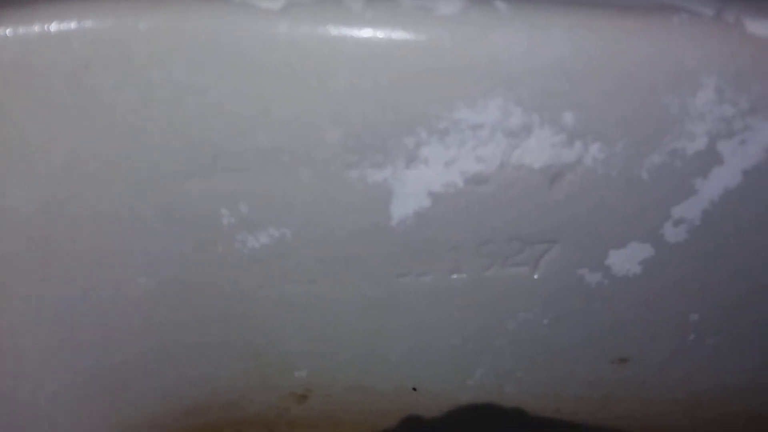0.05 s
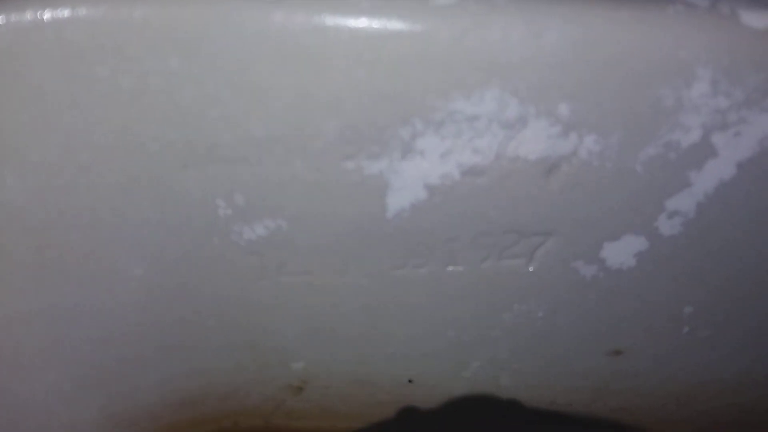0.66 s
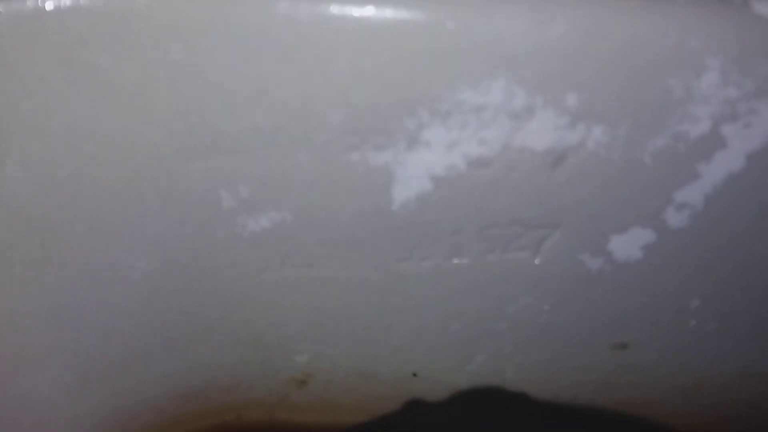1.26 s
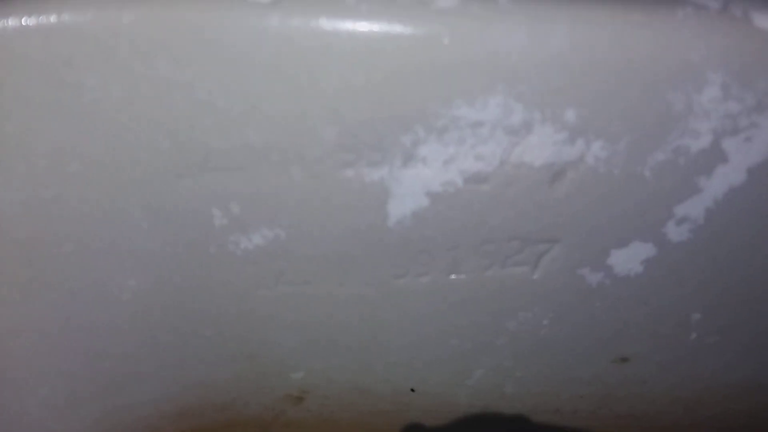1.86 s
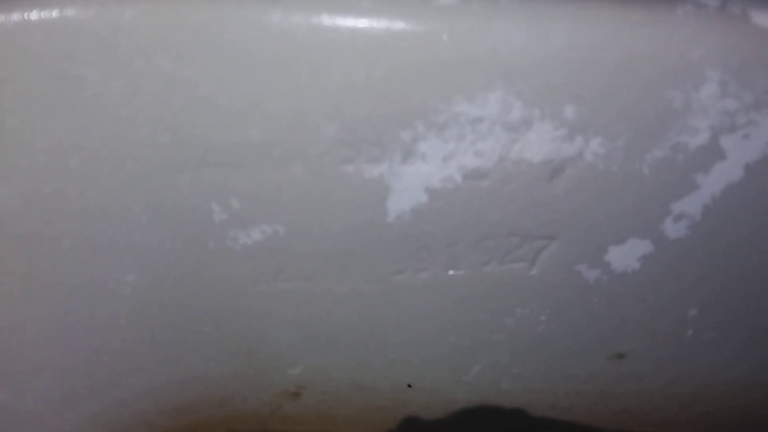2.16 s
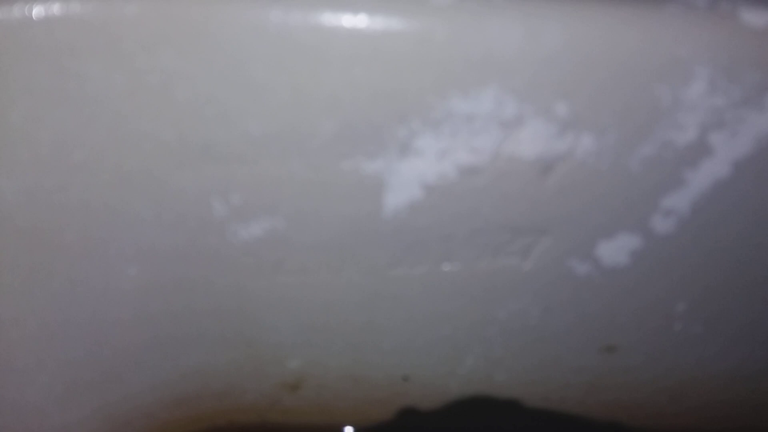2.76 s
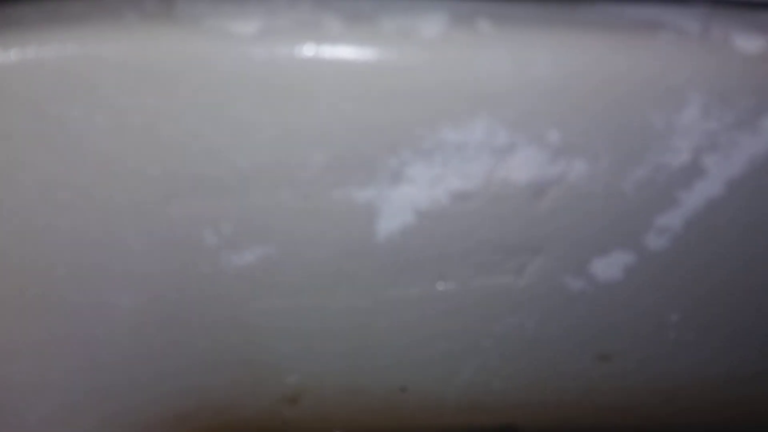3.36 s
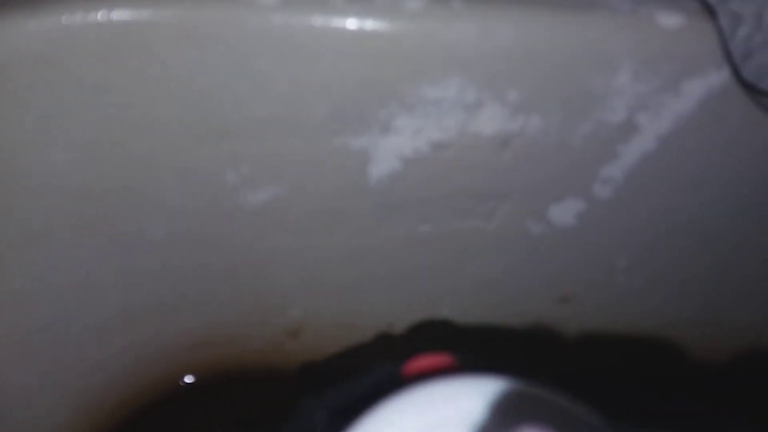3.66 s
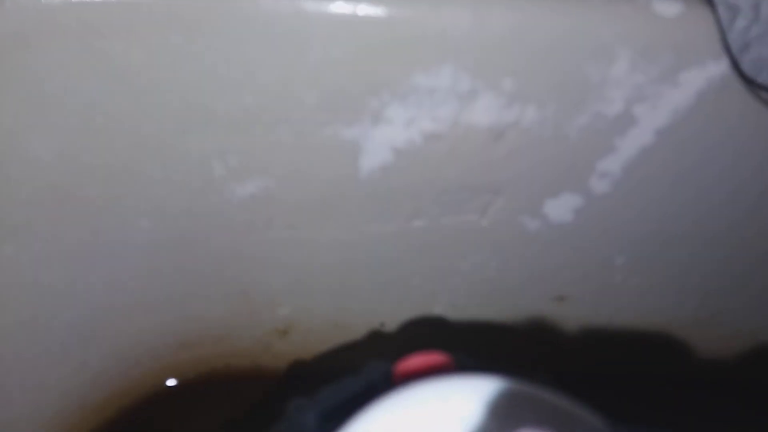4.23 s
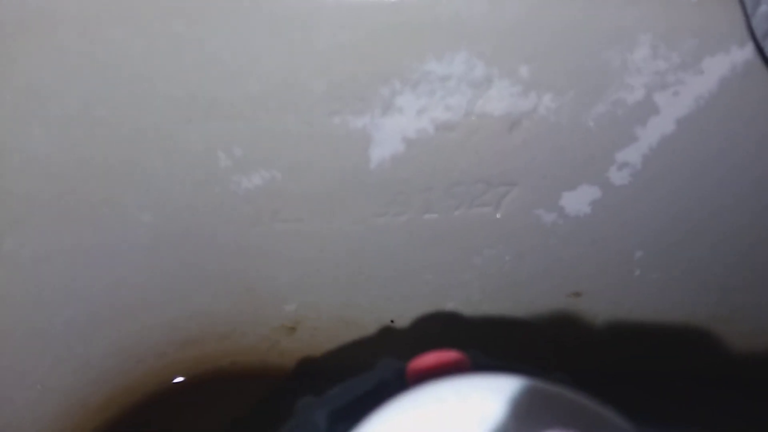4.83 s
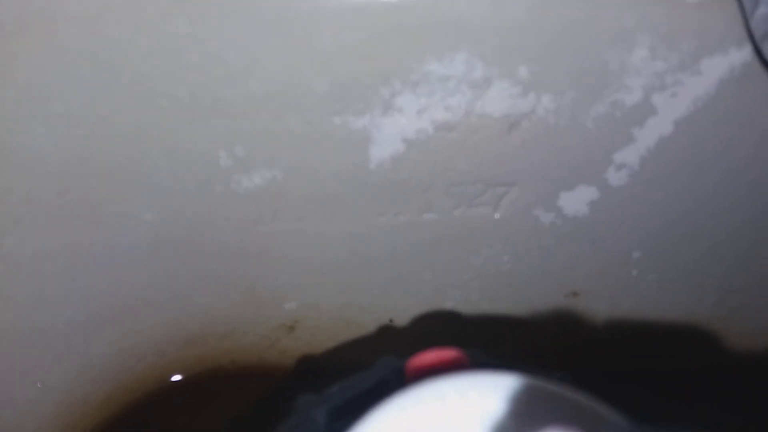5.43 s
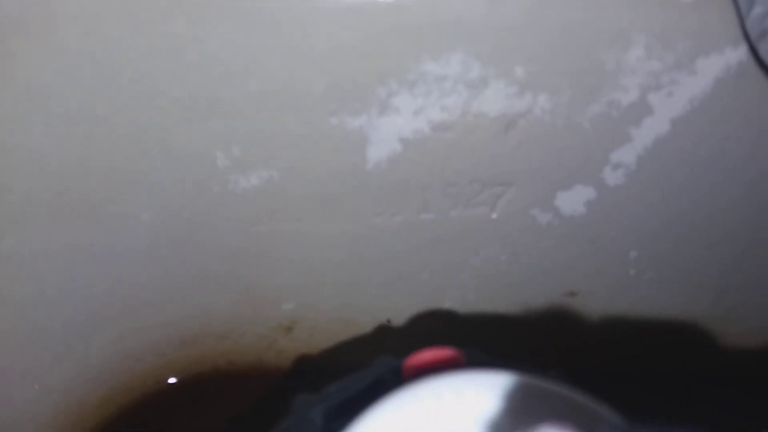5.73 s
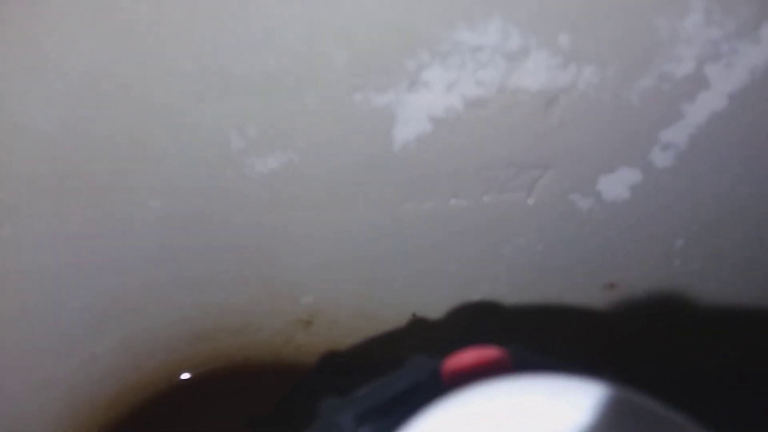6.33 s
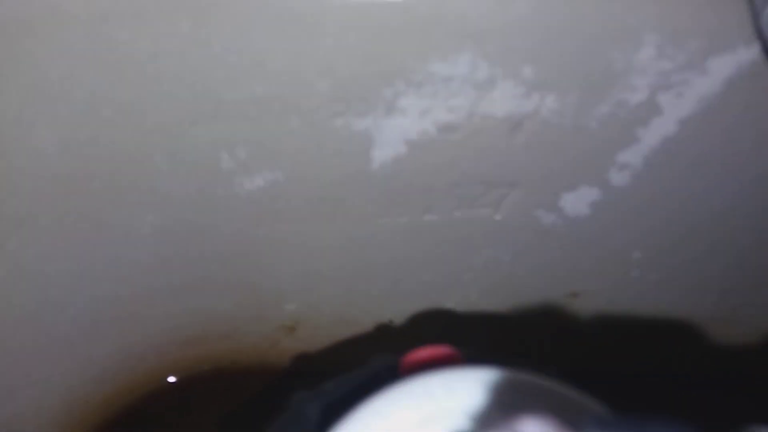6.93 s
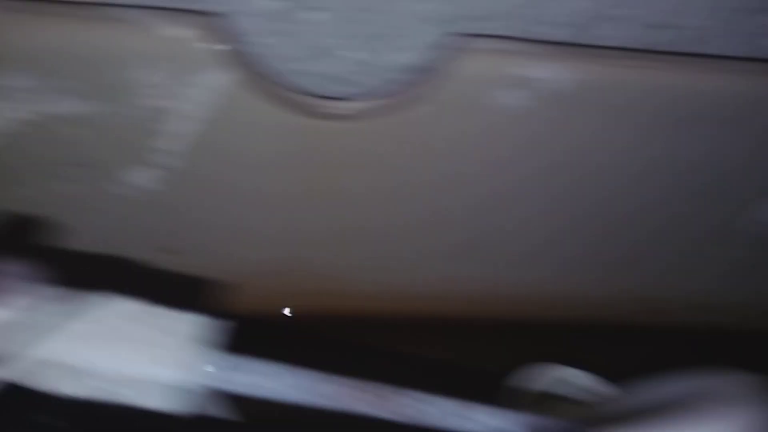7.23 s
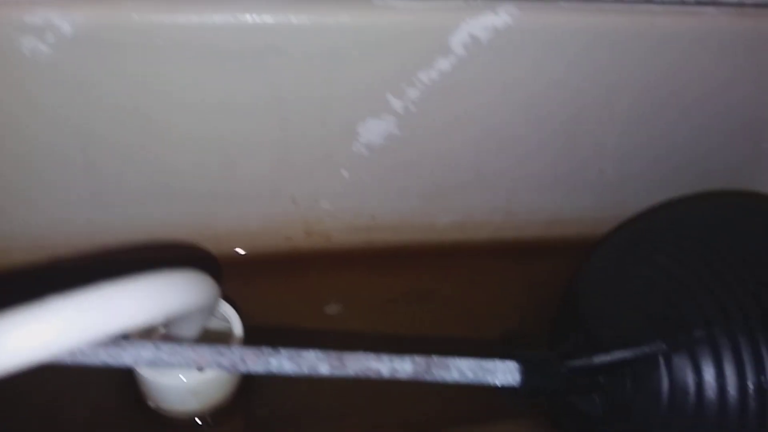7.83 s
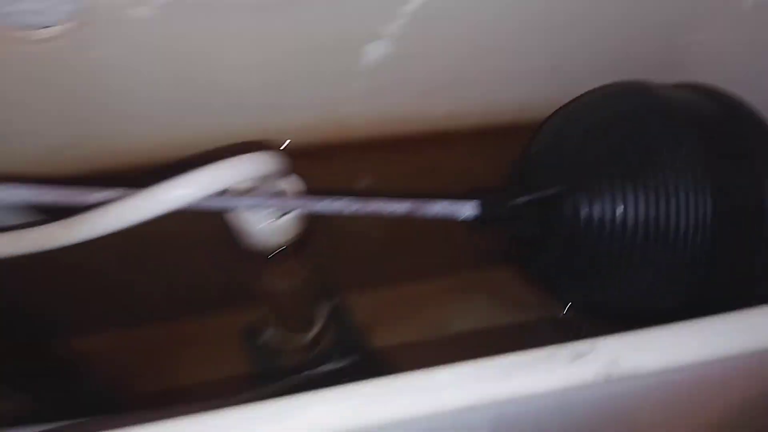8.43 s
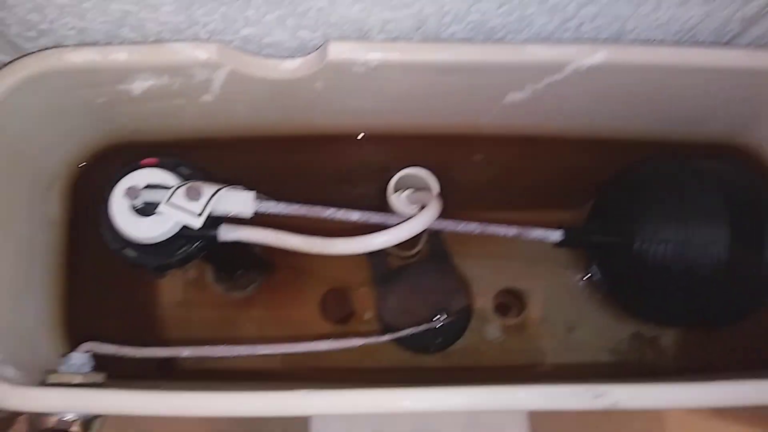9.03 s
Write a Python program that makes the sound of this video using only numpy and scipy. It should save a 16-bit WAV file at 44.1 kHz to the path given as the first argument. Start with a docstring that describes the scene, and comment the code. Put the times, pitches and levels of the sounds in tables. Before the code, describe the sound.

A toilet tank refills with a shrill hiss that softens and chokes off, leaving faint trickling spurts and one sharp click.

```python
"""A loud, whistling hiss: water jets through a float valve to refill an open porcelain toilet tank.
Tiny vapour bubbles collapse in the jet and make it shriek. It drops to a smooth rush, then the valve
shuts and only seeps in small spurts. The tank's ringing colours the water's sound. Near the end the
listening point, a hand-held camera, is lifted out of the tank with a bump and a click.
A low room rumble and a thin electronic whine lie underneath."""
import sys
import numpy as np
from scipy import signal
from scipy.fft import rfft, irfft
from scipy.io import wavfile
from scipy.ndimage import uniform_filter1d

SR = 44100
rng = np.random.default_rng(int(sys.argv[2]) if len(sys.argv) > 2 else 0)


def put_to_file(sound):
    """Save the sound as 16-bit audio at rate SR, in the file named by the first command-line argument."""
    columns = np.atleast_2d(sound).T  # one column per channel
    safe = np.clip(columns, -1, 1)
    whole_steps = np.round(safe * 32767)
    wavfile.write(sys.argv[1], SR, whole_steps.astype(np.int16))


N = 400428
T = np.arange(N) / SR  # time in seconds
F = np.maximum(np.fft.rfftfreq(N, 1 / SR), 1)  # frequency in Hz
# when the jet turns smooth, the valve shuts and the microphone clears the rim, in seconds
SMOOTH_S, SHUT_S, LIFT_S = 1.752, 3.807, 7.15

# Tone colour of the swirling water at each stage. Each row: frequency in Hz, relative level in dB.
JET_SPECTRUM = [(100,-39.5),(170,-23.5),(300,-19.5),(600,-12.5),(900,-16),(1300,-9.5),(2100,-1.5),(3200,-0.5),(4300,-1.5),(5500,2),(6800,2),(8000,-8.5),(10000,-19),(15500,-21)]
RUSH_SPECTRUM = [(100, -37), (170, -15), (330, -8.5), (600, -0.5), (900, -5), (1300, -1), (2100, 4),
                 (3200, -2), (4300, -6), (6800, -10), (8000, -16.5), (10000, -30), (15500, -34)]
CHOKE_SPECTRUM = [(100,-22),(200,-10),(600,3.5),(900,-14),(1500,6.5),(2300,0),(2850,4.5),(3500,-11),(4500,-8.5),(5900,-4.5),(8200,-11),(11000,-30),(15500,-28)]
SEEP_SPECTRUM = [(100, -23), (170, -15.5), (400, 7), (650, -5), (900, -13.5), (1300, 1), (2100, -10),
                 (3200, -7), (4300, -7), (6800, -14), (8000, -13.5), (10000, -28), (15500, -38)]
ABOVE_RIM_SPECTRUM = [(100,-32),(200,-3),(480,-7.5),(850,-4),(1350,-0.5),(1800,-3),(2500,-11.5),(3300,-16),(4200,-10.5),(6500,-17),(9300,-31),(12000,-28),(15500,-32)]
# Ringing of the tank's air and walls. Each row: frequency in Hz, width in Hz, boost in dB.
TANK_RESONANCES = [(180,17,-3),(233,33,9.5),(396.4,12,10),(464,31,5.5),(789,130,11.5),(876.7,62,18),(1026,90,11),(1134,50,10),(1442,72,7.5),(1553,139,15),(1682,70,11),(1861,154,15),(2050,26,1.5),(2324,254,17),(2543,51,9),(2672,44,8),(2740,22,5.5),(2789,150,10),(3020,250,10),(3230,44,-1),(3356,64,9.5),(3567,95,10.5),(3914,320,11),(4165,377,14),(4703,306,15.5),(5046,170,5),(5410,99,6),(5980,130,8),(6400,130,2.5),(6670,84,8.5),(7070,200,7),(8230,252,4.5),(8930,140,5.5),(10060,280,7.5),(11200,320,6.5),(13000,450,7.5),(14100,300,4),(15400,300,5)]
# Surges of the low whistle. Each row: peak time in seconds, level in dB, half-length in seconds.
WHISTLE_SURGES = [(0.012, -3.5, 0.012), (0.084, -1.5, 0.0046), (0.143, -6, 0.0075), (0.166, -6.5, 0.0096),
                  (0.197, -8.5, .009), (0.251, -9, 0.0035), (0.292, -15, 0.0069), (0.353, -9.5, 0.005),
                  (0.407, -14, 0.017), (0.564, -5.5, 0.0037), (0.732, -12.5, .006), (0.801, -7, 0.006),
                  (0.865, -10, 0.0034), (1.033, -13, 0.005)]
# Squeals of collapsing bubbles.
# Each row: peak time in seconds, level in dB, half-length in seconds, pitch in Hz.
BUBBLE_SQUEALS = [(.70, -20, 0.068, 3950), (0.73, -22, 0.0077, 3000), (0.792, -24, .012, 3000),
                  (0.9, -15, 0.0078, 3000), (0.912, -12, 0.0076, 3800), (1.683, -19.5, 0.034, 4220)]
# Spurts past the shut valve. Each row: start and end in seconds, body boost in dB, churn boost in dB.
LEAK_SPURTS = [(3.8, 3.95, 9, 5), (4.116, 4.21, 8.5, 4.5), (4.38, 4.544, 7.5, 4), (4.903, 5.816, 6, 2.5),
               (5.866, 6.396, 6, 2.5), (6.79, 7.25, 5, 0.5)]
# The overflow tube rings as the microphone passes it.
# Each row: peak time in seconds, level in dB, half-length in seconds.
TUBE_SWELLS = [(6.95, -50.5, 0.23), (7.47, -46, .19)]
# Knocks on the camera body.
# Each row: start in seconds, peak level in dB, decay in seconds, pitch in Hz, width in Hz.
CAMERA_KNOCKS = [(7.07,-32.5,0.015,2200,4970),(7.071,-36.5,0.015,178,110),(7.104,-44,.001,6200,5050),(7.133,-43,.001,6000,5000),(7.3119,-21,0.00057,3980,5500),(7.455,-37,0.0007,5400,4000)]
# Steady room air and microphone hiss. Each row: frequency in Hz, relative level in dB.
ROOM_SPECTRUM = [(25,-38),(60,-18),(95,-9),(130,-7.5),(177,3.5),(203,-2),(228,1.5),(270,-3),(600,-18.5),(2000,-44),(5000,-23),(9500,-28.5),(15500,-23.5)]


def valve():
    """The water goes from jet to rush to seep; lifting the microphone loses most of the tank's colour."""
    walls = tank(echo_db=-7, echo_s=0.0062)
    flowing = blend(jet(walls), rush(walls), step(SMOOTH_S, 0.0069))
    inside = blend(flowing, seep(walls), step(SHUT_S, 0.042)) + choke(walls)
    return blend(inside, above_rim(walls), step(LIFT_S, 0.19)) + hollow_air()


def water(levels_db, response, grain_db, flutter_db):
    """Countless tiny, uneven bursts in three fluttering bands: low churn, middle body and high hiss."""
    grains = rng.standard_normal(N) * amp(grain_db * np.clip(rng.standard_normal(N), -2, 1))
    bursts = rfft(grains) * response
    churn = 1 / (1 + (F / 1320) ** 12)
    hiss = 1 - 1 / (1 + (F / 3350) ** 12)
    # each band's level is set between the two frequencies beside it, in Hz
    bands = [(churn, 600, 1300), (1 - churn - hiss, 1400, 2100), (hiss, 3700, 7000)]
    out, shared_flutter = 0, walk(34)
    for (band, low_hz, high_hz), db in zip(bands, levels_db):
        strength = np.sqrt(2 * np.sum(np.abs(bursts[(F > low_hz) & (F < high_hz)]) ** 2)) / N
        flutter = flutter_db * (shared_flutter + walk(52))
        out = out + irfft(bursts * band, N) / strength * amp(db + flutter)
    return out


def jet(walls, thin_db_per_s=3.5, flare_db=3):
    """Bubbles collapse in the open valve. Body and spray thin as the float rises; hiss flares once."""
    levels_db = -31.5, -26 - thin_db_per_s * T, -21.5 + flare_db * hump(1.064, 0.065)
    spray = amp(-49 - 6 * T) * noise(walls * resonance(12000, 7000) ** 2)
    flow = water(levels_db, walls * colour(JET_SPECTRUM), grain_db=6, flutter_db=0.48)
    return flow + spray + shriek(walls) + whistles()


def shriek(walls, grow_db_per_s=3, climb_hz_per_s=560, jump_hz=800, width_hz=460):
    """Collapsing bubbles sputter, climb, jump in pitch and squeal, stirring the tank's resonances."""
    bubbles = cloud(width_hz)
    hz = 2450 + climb_hz_per_s * T + jump_hz * step(.66, .09) + 110 * walk(22.19)
    in_tank = shape(at_pitch(bubbles, hz), walls)
    loudness = np.sqrt(uniform_filter1d(in_tank ** 2, size=1500))
    squeals = sum(amp(db) * hump(at_s, half_s) * at_pitch(bubbles, squeal_hz)
                  for at_s, db, half_s, squeal_hz in BUBBLE_SQUEALS)
    sputter_db = 1.6 * walk(39)
    return in_tank / loudness * amp(-24.5 + grow_db_per_s * T + sputter_db) + squeals


def whistles(sputter_db=2.5, sputter_hz=45):
    """The jet blows three notes in the valve. Each swells and fades as the gap narrows."""
    tone = unit(signal.hilbert(ring(2378, 62) + amp(-4) * ring(2326, 82)))
    strength = np.abs(tone)
    even_tone = tone.real / (strength + 0.16)
    # only the lowest note sputters and surges
    drive = amp(-16 + swell(0.37, 29, 11) + sputter_db * walk(sputter_hz)) * (1 - step(1.58, 0.046))
    low = (drive * (.5 + strength) + humps(WHISTLE_SURGES)) * even_tone
    middle = amp(-27 + swell(1.0, 9, 2.9)) * ring(3547, 34.5)
    high = amp(-31 + swell(0.29, 38, 11.5)) * ring(6790, 190)
    return low + middle + high


def rush(walls, sag_db_per_s=1.7):
    """The smooth rush fades slowly, then faster as the valve's washer pinches the flow."""
    sag_db = sag_db_per_s * (T - SMOOTH_S)
    pinch = step(3.54, 0.18)
    levels_db = -32 - sag_db - 8 * pinch, -31 - sag_db - 7 * pinch, -26 - sag_db - 7 * pinch
    whistle = amp(-45.5) * ring(6380, 130) * (1 - step(3.54, 0.21))
    return water(levels_db, walls * colour(RUSH_SPECTRUM), grain_db=2.5, flutter_db=-0.02) + whistle


def choke(walls, peak_s=3.775):
    """A last spurt squeaks through the closing gap; its hiss lingers and ends in two thin rings."""
    body_db, hiss_db = swell(peak_s, 41, 210), swell(peak_s, 57, 114)
    levels_db = -43 + body_db, -34.5 + body_db, -35 + hiss_db
    squeak = amp(-35) * hump(3.66, .04) * ring(2850, 200)
    tail = amp(-45 + swell(3.87, 50, 55)) * (ring(4120, 400) + amp(-5) * ring(2800, 700))
    return water(levels_db, walls * colour(CHOKE_SPECTRUM), grain_db=3, flutter_db=-0.4) + squeak + tail


def seep(walls, spurt_sag_db_per_s=2.5, hiss_sag_db_per_s=0.7):
    """The shut valve leaks in spurts and sings in the pipe. The leak grows as the microphone nears."""
    spurt_db, splash_db = 0, 0
    for start_s, end_s, body_db, churn_db in LEAK_SPURTS:
        gate = step(start_s, .005) * (1 - step(end_s, .011))
        spurt_db += gate * (body_db - spurt_sag_db_per_s * (T - start_s))
        splash_db += gate * churn_db
    near = step(6.36, 0.1)
    hiss_db = -52 + 0.4 * spurt_db - hiss_sag_db_per_s * (T - SHUT_S)
    levels_db = -57.5 + splash_db + 6.5 * near, -54.5 + spurt_db + 3 * near, hiss_db
    leak = water(levels_db, walls * colour(SEEP_SPECTRUM), grain_db=2.5, flutter_db=0.7)
    gurgle = amp(-63 + 1.5 * spurt_db) * ring(1580, 220)
    pipe = amp(-66.5) * ring(568, 20) + amp(-69) * ring(837, 40) + amp(-68.5) * ring(5890, 260)
    thin_whistle = amp(-49 + swell(6.35, 31, 140)) * ring(4100, 330)
    return leak + gurgle + pipe + thin_whistle


def above_rim(walls):
    """From above, the seep recedes. Its hiss dips, then opens as the microphone faces the valve again."""
    away = step(8.48, 0.35)
    levels_db = -50 - away, -48 - 4.5 * away, -58.5 + 3 * away - 10 * hump(8.03, 0.25)
    faint_walls = np.abs(walls) ** 0.036
    leak = water(levels_db, faint_walls * colour(ABOVE_RIM_SPECTRUM), grain_db=4.5, flutter_db=0.13)
    airy_hiss = amp(-68) * hump(8.8, .25) * ring(11000, 2500)
    direct = leak + airy_hiss
    # the echo off the water surface comes later as the microphone rises
    lag_s = 0.00218 + 0.00111 * (T - 7)
    return direct + 0.19 * np.interp(T - lag_s, T, direct)


def tank(echo_db, echo_s):
    """The tank as a filter: its resonances, rippled by quick echoes between the glazed walls."""
    boost_db = sum(db / (1 + (2 * (F - hz) / width_hz) ** 2) for hz, width_hz, db in TANK_RESONANCES)
    echoes = unit(rfft(rng.standard_normal(N) * np.exp(-T / echo_s)))
    return amp(boost_db) * (1 + amp(echo_db) * echoes * F / (F + 3000))


def hollow_air(inside_hz=1590, drop_hz=250):
    """The air over the water rings and sinks in pitch as the microphone rises past the overflow tube."""
    hz = inside_hz - drop_hz * step(7.3, .14)
    air = unit(at_pitch(cloud(width_hz=75), hz))
    gate = step(6.85, .1) * (1 - step(8.27, .08))
    tube = humps(TUBE_SWELLS) * ring(1045, 53)
    return amp(-51.5) * gate * air + tube


def handling(click_s=7.3119, click_db=-14):
    """A soft bump, small ticks and one sharp plastic click on the camera body."""
    knocks = 0
    for start_s, db, decay_s, hz, width_hz in CAMERA_KNOCKS:
        push = rng.standard_normal(N) * (T >= start_s) * np.exp(-np.abs(T - start_s) / decay_s)
        knock = shape(push, resonance(hz, width_hz) ** 2)
        knocks += amp(db) * knock / np.abs(knock).max()
    age = np.maximum(T - click_s, 0)
    snap = age * np.exp(-age / .00006) * np.sin(2 * np.pi * 7000 * age)
    click = shape(snap, resonance(7000, 9000) ** 2)
    return knocks + amp(click_db) * click / np.abs(click).max()


def rustle(db=-56, grain_db=4):
    """Fingers slide on the camera body during the lift."""
    grains = rng.standard_normal(N) * amp(grain_db * walk(300))
    return amp(db) * hump(7.27, 0.13) * unit(shape(grains, resonance(4000, 2800) ** 2))


def whine(hz=8070, frame_hz=60, on_share=0.94, db=-67.5):
    """The camera's electronics sing, pausing briefly in every frame."""
    cycle = T * frame_hz % 1
    gate = uniform_filter1d(1. * (cycle < on_share), size=40)
    tone = np.sin(2 * np.pi * (hz * T - .4 * cycle)) + 0.55 * ring(8040, 130)
    return amp(db) * unit(tone * gate)


def background(outside_db=6, swell_db=9):
    """Room air, two low, boomy rings of the tank, and a rumble that is louder outside and swells once."""
    air = amp(-57) * noise(colour(ROOM_SPECTRUM))
    tank_boom = amp(-62) * ring(180.2, 17) + amp(-57) * ring(228.8, 14) * step(7.23, 0.25)
    rumble = unit(np.sin(2 * np.pi * 62 * T + walk(3)) + 0.56 * ring(67, 26))
    rumble_db = -71 + outside_db * step(7.2, 0.45) + swell_db * hump(8.34, .18)
    return air + tank_boom + amp(rumble_db) * rumble


def amp(db):
    """Turn decibels into a gain to multiply by."""
    return 10 ** (np.asarray(db) / 20)


def unit(x):
    """Scale to an average power of 1."""
    return x / np.sqrt(np.mean(np.abs(x) ** 2))


def colour(points):
    """A gain for every frequency, drawn through (Hz, dB) points."""
    hz, db = np.transpose(points)
    return amp(np.interp(np.log(F), np.log(hz), db))


def shape(x, gain):
    """Filter a sound with a gain for every frequency."""
    return irfft(rfft(x) * gain, N)


def noise(gain):
    """Filtered noise with an average power of 1."""
    return unit(shape(rng.standard_normal(N), gain))


def resonance(hz, width_hz):
    """The filter of something that rings at one pitch and dies away."""
    return 1 / (1 + 1j * (F ** 2 - hz ** 2) / (F * width_hz))


def ring(hz, width_hz):
    """A breathy note: one resonance stirred by noise."""
    return noise(resonance(hz, width_hz) ** 2)


def walk(rate):
    """A smooth random wobble that changes about rate times a second."""
    return noise(1 / (1 + (F / rate) ** 4))


def cloud(width_hz):
    """A band of noise around 0 Hz, ready for at_pitch to move."""
    return walk(width_hz) + 1j * walk(width_hz)


def at_pitch(band, hz):
    """Move a band of noise up to a steady or gliding pitch."""
    phase = 2 * np.pi * np.cumsum(np.broadcast_to(hz, N)) / SR
    return (band * np.exp(1j * phase)).real


def step(at_s, length_s):
    """A smooth change from 0 to 1."""
    return .5 + .5 * np.tanh((T - at_s) / length_s)


def blend(a, b, share):
    """Fade from one sound to another at even power."""
    return a * np.sqrt(1 - share) + b * np.sqrt(share)


def hump(at_s, half_s):
    """A bell-shaped rise to 1 and back."""
    return np.exp(-np.minimum(((T - at_s) / half_s) ** 2, 50))


def humps(table):
    """Add up one hump of gain for each row."""
    return sum(amp(db) * hump(at_s, half_s) for at_s, db, half_s in table)


def swell(peak_s, rise_db_per_s, fall_db_per_s):
    """A level in dB that climbs steadily to 0 and sinks again."""
    slope = np.where(T < peak_s, rise_db_per_s, fall_db_per_s)
    return np.maximum(-np.abs(T - peak_s) * slope, -120)


def scene():
    """Water, camera noises and background, added into one channel."""
    return (valve() + handling() + rustle() + whine() + background())[None]


def record(dry, ceiling=.95, top_hz=15750):
    """Round off the highest peaks and cut the very top of the treble."""
    rounded = dry / (1 + (dry / ceiling) ** 6) ** (1 / 6)
    return signal.sosfilt(signal.ellip(10, .1, 70, top_hz, fs=SR, output="sos"), rounded)


dry = scene()
out = record(dry)
put_to_file(out)
```